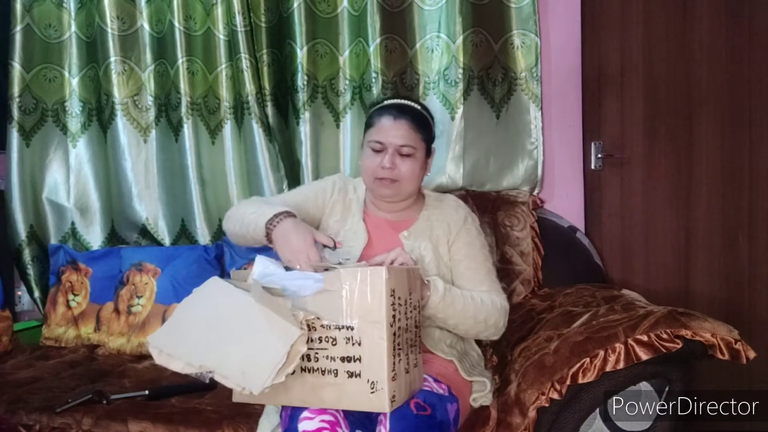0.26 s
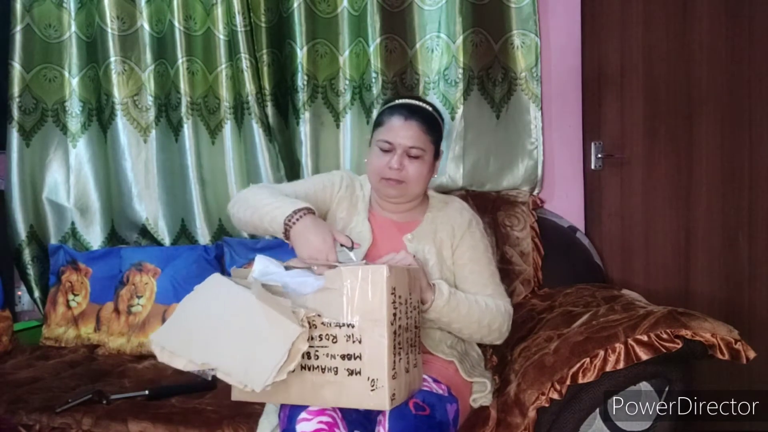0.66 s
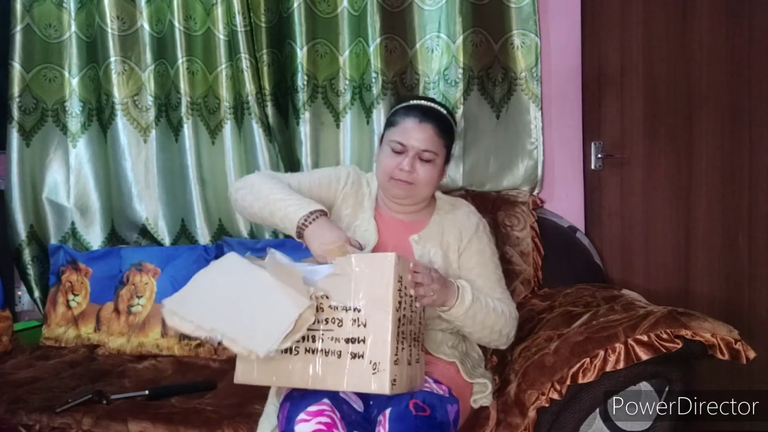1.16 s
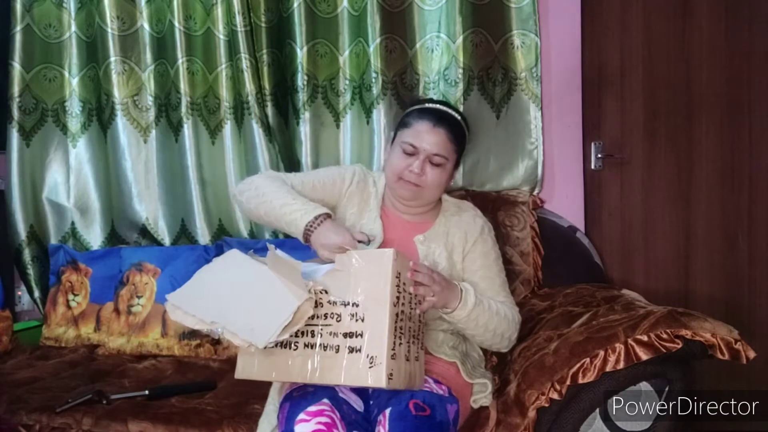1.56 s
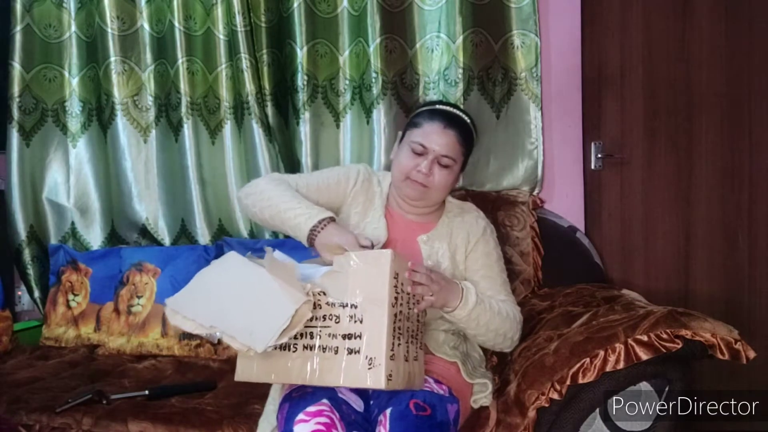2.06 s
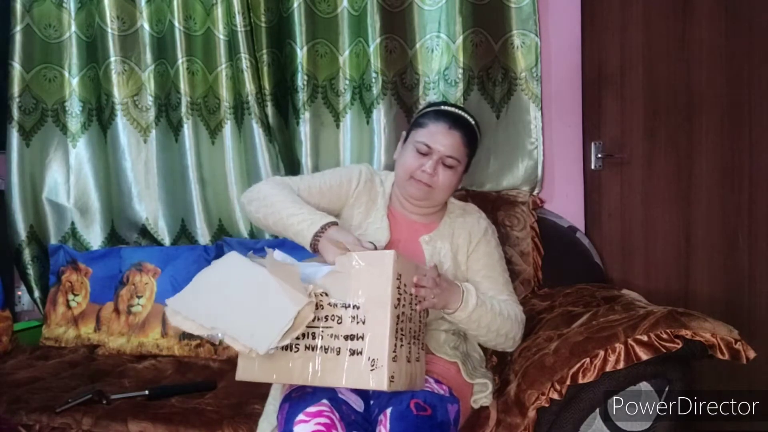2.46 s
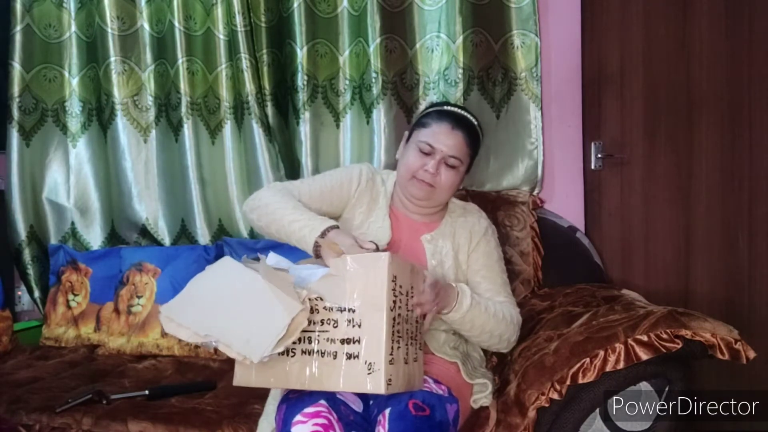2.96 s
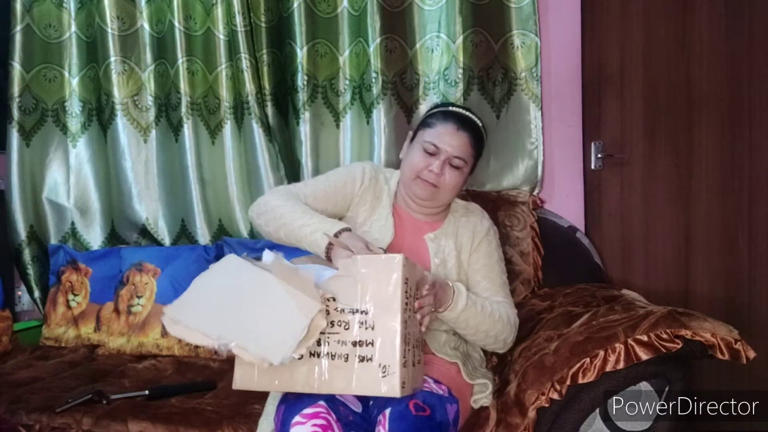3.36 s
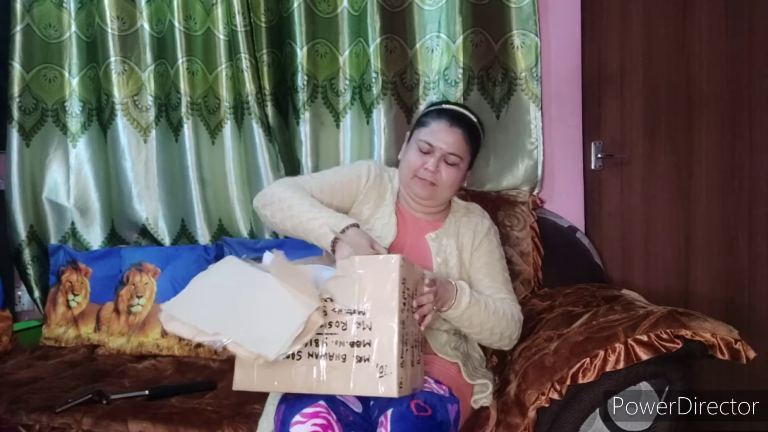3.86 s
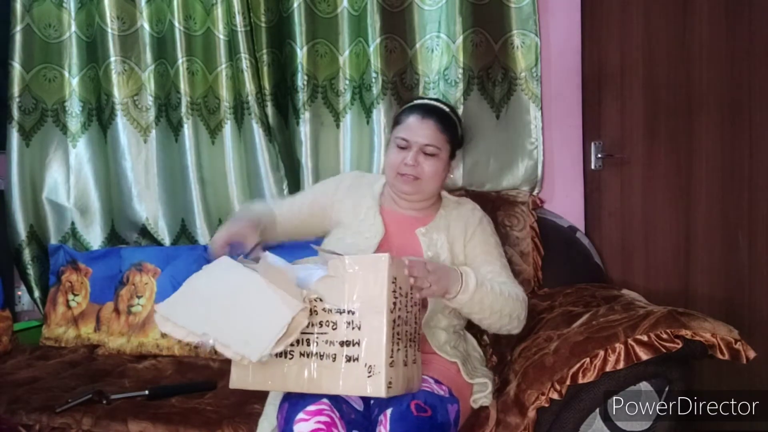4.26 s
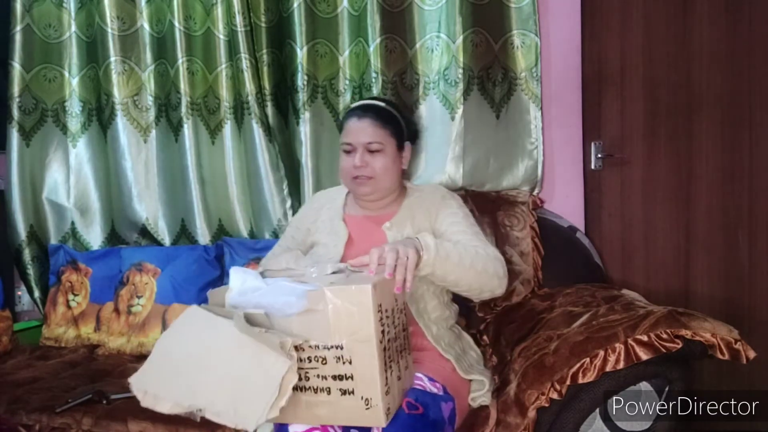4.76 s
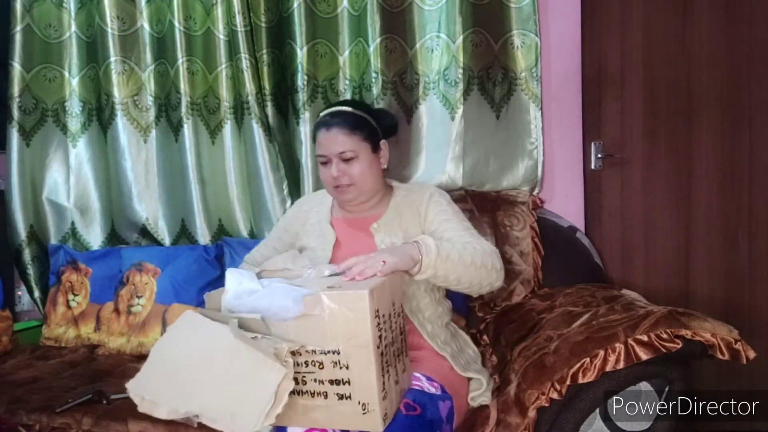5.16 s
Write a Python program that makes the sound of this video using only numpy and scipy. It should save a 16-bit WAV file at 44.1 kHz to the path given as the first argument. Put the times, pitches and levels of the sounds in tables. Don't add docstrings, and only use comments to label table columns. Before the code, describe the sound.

In a small furnished room, hands dig packing paper from a cardboard box about two metres from a phone's stereo microphone. Faint rustling opens, then a hollow knock at one second starts irregular crinkles, snaps and cardboard thumps. The loudest, sharpest paper crackle comes just after four seconds, followed by a lull, light crinkling and a final push of the box. Faint hiss and low rumble lie underneath.

```python
import sys
import numpy as np
from scipy import signal
from scipy.fft import rfft, irfft
from scipy.io import wavfile
from scipy.ndimage import uniform_filter1d

SR = 44100
rng = np.random.default_rng(int(sys.argv[2]) if len(sys.argv) > 2 else 0)


def store_pcm(level_fs):
    pcm = np.round(np.clip(level_fs, -1, 1) * 32767).astype(np.int16)
    wavfile.write(sys.argv[1], SR, np.atleast_2d(pcm).T)


def attenuation_scalar(level_db):
    decades = np.asarray(level_db, float) / 20
    return 10 ** decades


N = 238856


def walk(hold_s):
    k = int(hold_s * SR)
    levels = rng.standard_normal(1000)
    return uniform_filter1d(levels[np.arange(N) // k % 1000], k)


def grit(per_s, spread_db, flurry_db, flurry_s):
    chance = rng.random((N, 3)).T
    size_db = np.minimum(-spread_db * np.log(chance[1] + 1e-9), 4 * spread_db)
    size_db = size_db + flurry_db * walk(flurry_s)
    clicks = (chance[0] < per_s / SR) * attenuation_scalar(size_db) * np.sign(chance[2] - 0.5)
    return clicks / clicks.std()


def blows(times, db, shapes):
    out = np.zeros(N + shapes.shape[1])
    for s, gain, shape in zip(times, attenuation_scalar(db), shapes):
        out[int(s * SR):][:len(shape)] += gain * shape
    return out[:N]


def effort(sudden, slow, sudden_s, slow_share):
    s, db, fade, *relative = np.vstack([sudden, slow]).T
    fade = np.maximum(fade, 0.01)
    rise = np.r_[np.full(len(sudden), sudden_s), slow_share * fade[len(sudden):]]
    t = np.arange(0, N + 88, 44) / SR
    late = t[:, None] - s
    shape = attenuation_scalar(-40 * np.where(late < 0, -late / rise, late / fade))
    tracks = [10 * np.log10(shape @ attenuation_scalar(2 * (db + r)) + 1e-14) for r in [0, *relative]]
    return [np.interp(np.arange(N) / SR, t, track) for track in tracks]


def band(x, lo_hz, hi_hz):
    return signal.sosfilt(signal.butter(2, [lo_hz, hi_hz], "band", fs=SR, output="sos"), x)


def paper():
    # (time [s], crackle level [dB], 20 dB fade [s], papery body re crackle [dB])
    grabs = [(0.0, -52.5, 0.13, -26), (1.04, -48, 0.0532, -2), (1.16, -55.5, 0.1, -1.5),
             (1.51, -52.5, 0.17, -9.5), (1.88, -50, 0.04, 1.5), (2.55, -54, 0.2, -12),
             (2.655, -43.5, -0.17, -13), (3.59, -54.5, 0.12, 2.5), (4.01, -41.5, 0.194, -5.5),
             (4.96, -51, -4.55, -20), (5.29, -49.5, 1.5, -13)]
    pulls = [(.29, -58, 0.21, -22), (.5, -56.5, 0.33, -16), (0.789, -64, 0.24, -2),
             (.92, -59, 0.066, -34.5), (1.27, -56.5, 0.14, -12), (1.338, -46.5, 0.066, -6.5),
             (1.749, -43.5, 0.068, -8.5), (1.93, -49, 0.047, -23), (2.08, -56.5, .12, -7),
             (2.149, -51, 0.072, -1.5), (2.2, -61, 0.18, 2.5), (2.25, -56.5, .07, -8),
             (2.33, -49, 0.11, -6.5), (2.4, -55.5, 0.13, -23), (2.69, -55, 0.092, 6.5),
             (2.819, -47, .2, -13), (2.948, -49, 0.053, -6.5), (3.1, -68, 0.14, -15),
             (3.23, -47, 0.19, -7.5), (3.389, -51, 0.11, -5), (3.53, -53, 0.094, -8), (3.72, -53, 0.27, -8),
             (3.817, -48, 0.15, -8.5), (4.068, -29, 0.043, -13.5), (4.1, -35, 0.046, -25),
             (4.19, -57, 0.39, -16), (4.388, -55.5, 0.06, -11.5), (4.62, -67, 1, -6), (4.82, -64, 0.23, -6),
             (5.05, -52.5, 0.13, -6)]
    # (time [s], peak level [dB], papery body re peak [dB], thin top re peak [dB])
    snaps = [(0.4683, -41, -16, -23), (0.9043, -45, -33, -44), (1.1456, -46, -25, -21),
             (1.3319, -41, -12, -23), (1.5032, -36, -6.5, -13.5), (1.7499, -38, -27, -36),
             (1.922, -43, -2.5, -34), (2.0279, -50, -2.5, -46), (2.1249, -37, -6, -42),
             (2.1583, -31, -11, -61), (2.5351, -54, 4, -39), (2.6543, -25, -9.5, -51),
             (2.809, -34.5, -32, -37), (2.9464, -48, -15, -28), (3.5897, -37, 0.5, -48),
             (3.6506, -37.5, -4, -43), (4.0081, -38, -2, -29), (4.0632, -26.5, -5, -30),
             (4.0863, -30, -20, -32), (4.0932, -20, -35, -43), (4.1126, -22, -23, -36),
             (4.7019, -51, -25, -17), (4.8209, -54, -25, -12), (4.955, -52, -22, -26),
             (5.0168, -41.5, -22, -37), (5.0265, -51, -15, -33), (5.0545, -46, -19, -22)]
    tears = [(0.3006, -48, -21, -32), (1.0153, -42, -41, -40), (1.0375, -37.5, -11, -15),
             (1.245, -51, -25, -26), (1.2974, -42, -5, -22), (1.3072, -38.5, 3, -15),
             (1.728, -55, -29, -38), (1.873, -47, 1, -26), (2.2454, -38.5, -34, -44),
             (2.3087, -46, -5, -14), (2.7666, -41, 1.5, -36), (2.906, -39, -5, -22),
             (3.0423, -43.5, -2, -27), (3.1844, -42, -9, -27), (3.377, -43.5, 2, -33),
             (3.8112, -49, -16, -19), (4, -41.5, -24, -19), (4.0407, -29, -10, -31),
             (4.3685, -46, -22.5, -15), (4.9721, -41.5, -25, -19), (5.2847, -52, -24, -35),
             (5.2987, -41, -14, -13), (5.376, -37, -3, -16)]

    crisp_db, body_db = effort(grabs, pulls, sudden_s=0.027, slow_share=0.94)
    clicks = grit(per_s=2500.0, spread_db=2.0, flurry_db=3.5, flurry_s=0.012)
    s, snap_db, snap_body_db, snap_top_db = np.vstack([snaps, tears]).T
    snap_ms, tear_ms = 0.13, 3.8
    ms = np.repeat([snap_ms, tear_ms], [len(snaps), len(tears)])
    splutter = rng.standard_normal((len(s), 800))
    splutter[:, 0] = 6 * np.exp(-ms)
    splutter = splutter * np.exp(-np.arange(800) / SR * 1000 / ms[:, None])
    snap_db = snap_db - 5 * np.log10(ms)
    s = s + 0.0005

    crisp = clicks * attenuation_scalar(crisp_db + 7) + blows(s, snap_db + 8.0, splutter)
    body = clicks * attenuation_scalar(body_db + 19) + blows(s, snap_db + snap_body_db + 15.0, splutter)
    top = clicks * attenuation_scalar(crisp_db + 6.0) + blows(s, snap_db + snap_top_db + 29.5, splutter)
    return band(body, 1240.0, 3630.0) - band(crisp, 4100.0, 8980.0) + band(top, 12030.0, 21700.0)


def ring(x, modes):
    out, power = 0, 0
    for k, (hz, width_hz, db) in enumerate(modes):
        fade = np.exp(-np.pi * width_hz / SR)
        pole = fade * np.exp(2j * np.pi * hz / SR)
        mode = signal.lfilter([1], [1, -pole], x).imag
        out = out + (-1) ** k * attenuation_scalar(db) * np.sqrt(2 * (1 - fade ** 2)) * mode
        power += attenuation_scalar(2 * db)
    return out / np.sqrt(power)


def thuds(times, db, hz, t60):
    t = np.arange(SR // 3) / SR
    swell = 1 - np.exp(-t / 0.0042)
    return blows(times, db, np.sin(2 * np.pi * np.outer(hz, t)) * attenuation_scalar(-60 * t / t60) * swell)


def box():
    # (time [s], wall boom level [dB], 20 dB fade [s],
    # large flaps re boom [dB], small flaps re boom [dB])
    shoves = [(.1, -56.5, .14, -26, -15), (.29, -74, 0.1, -10, -19), (1.04, -36, 0.09, 5.5, -17),
              (1.3, -39, .09, -10, -10), (1.52, -51.5, -0.5, -10, 7), (1.88, -43.5, 0.12, -3, -7),
              (2.56, -47.5, -2.3, -17, 0.5), (2.78, -51.5, 0.23, -9, 4), (2.91, -45.5, .3, -1.5, -9.5),
              (3.05, -37.5, 0.1, -5, -38), (3.085, -43, -0.03, -29, -33), (3.57, -58.5, 0.87, -3, 8),
              (3.82, -44.5, 0.094, 7.5, 2), (4.01, -53.5, 0.27, 9, 5), (4.28, -57, 0.2, -10, -22.5),
              (4.6, -57, 0.04, 0, 5), (4.39, -65, 0.1, 12.5, 5)]
    # (time [s], wall boom level [dB], 20 dB fade [s], large
    # flaps re boom [dB], small flaps re boom [dB])
    leans = [(0.449, -66.5, 0.8, 5.5, -5), (.62, -64, 0.45, -1, 5), (.78, -62.5, 0.076, 5.5, 8.5),
             (1.065, -30, 0.027, -20, -30), (1.16, -55.5, 0.18, -11, -1), (1.34, -47.5, 0.12, -5, -0.5),
             (1.61, -57.5, 0.21, -1, -21), (1.76, -57, 0.22, 0, 5.5), (1.97, -55, .05, -7, -25),
             (2.15, -54, 0.11, 2, 3.5), (2.28, -61, 0.29, 8.5, 10.5), (2.37, -42, 0.094, 1.5, -8),
             (2.42, -53.5, 0.28, -25, -15), (2.62, -57, 0.13, 2.5, -17), (2.69, -60.5, 0.13, 7, 14.5),
             (2.98, -51, 0.12, -16, -24), (3.2, -56, 0.16, 4.5, 5.5), (3.39, -50.5, 0.17, 0.5, 1.5),
             (3.67, -56.5, .1, -13, -3), (3.76, -55, 0.14, 4, -10), (4.055, -39.5, 0.064, 7, 7.5),
             (4.2, -84.5, .15, 1, 0), (4.44, -67, 0.14, 6, -19), (4.95, -66.5, 1, -1.5, -1),
             (5.079, -43.5, 0.049, -9, -12),
        (5.35, -56.5, 0.19, 3.5, -0.5),
        (5.42, -36, 0.086, -12, -11.5),
    ]
    # (time [s], peak level [dB], pitch [Hz])
    bumps = [
        (0.108, -54, 89),
        (1.132, -58, 113),
        (2.789, -61, 56.6),
        (3.679, -79, 69.6),
        (4.097, -55, 85),
        (5.056, -59.5, 73.3),
        (5.378, -61, 56.5),
    ]
    # (time [s], peak level [dB], panel boom re peak [dB], panel pitch [Hz])
    knocks = [(0.19, -57.5, 3.5, 145), (0.263, -58, 4, 247), (0.437, -53.5, -11, 206),
              (0.524, -46.5, -8.5, 156), (0.644, -59, -2, 150), (0.746, -48, -12, 224),
              (1.038, -26.5, -1.5, 307.6), (1.298, -27, -12, 253), (1.333, -31, -10, 190),
              (1.505, -46.5, -9.5, 248), (1.582, -49, -2, 369), (1.74, -39.5, -15, 374.5),
              (1.874, -34, -10, 248), (1.922, -38, -5, 258), (2.08, -45.5, -9, 156),
              (2.358, -30.5, -10.5, 245), (2.538, -49, -3, 375), (2.596, -49, 4.5, 364),
              (2.674, -41.5, -6, 324), (2.773, -39, -10.5, 245), (2.835, -42, -11.5, 255),
              (2.875, -41, -15, 216), (2.907, -30, -16, 244), (3.045, -38, 2.5, 241),
              (3.108, -44, 1, 207.3), (3.338, -47, -5, 240), (3.813, -32.5, -9, 205.4),
              (4, -35.5, -4.5, 248.3), (4.249, -44.5, -15, 163), (5.341, -44, 0, 380)]
    # (time [s], peak level [dB], pitch [Hz])
    booms = [(1.051, -30.5, 153), (1.071, -34, 199), (1.324, -42, 199), (1.519, -52, 146),
             (2.352, -41, 204), (3.4, -40.5, 155.7), (3.679, -53, 159), (3.836, -35, 151),
             (4.276, -51.5, 165.6), (4.416, -53, 141), (5.071, -44.5, 176)]
    # (pitch [Hz], width [Hz], level [dB])
    wall_modes = [(126, 22, -10), (156, 13.7, -2), (199, 5, -1), (251.2, 31, -1.5), (294.3, 31, -0.5)]
    large_modes = [(367.4, 58, -1), (432.5, 96, 2), (505, 13.8, -3.5), (511.7, 16, 0), (642, 86, -6.5)]
    small_modes = [(788, 136, -0.5), (852, 35, 0.5), (898, 70, -5), (983, 60, -2.5), (1098, 90, -5),
                   (1219, 67, -6), (1580, 560, -5.5)]

    boom_db, large_db, small_db = effort(shoves, np.array(leans),
                                         sudden_s=0.014, slow_share=0.77)
    knock_s, knock_db, panel_db, panel_hz = np.transpose(knocks)
    contact_ms = 0.69
    phase = np.arange(200) / SR * 1000 / np.full((len(knock_s), 1), contact_ms)
    push = np.sin(np.pi * np.minimum(phase, 1))
    knock = blows(knock_s, knock_db + 27.5, push / push.sum(axis=1, keepdims=True))

    slips = grit(per_s=400.0, spread_db=2.5, flurry_db=2.0, flurry_s=0.02)
    boom = grit(per_s=200.0, spread_db=3.5, flurry_db=3.5, flurry_s=0.03) * attenuation_scalar(boom_db + 5.5)
    walls = ring(boom, wall_modes) + thuds(knock_s, knock_db + panel_db + 7, panel_hz, t60=0.17)
    large = ring(slips * attenuation_scalar(large_db + 6.0) + knock, large_modes)
    small = ring(slips * attenuation_scalar(small_db + 7.5) + knock * attenuation_scalar(3.0), small_modes)

    boom_s, side_db, side_hz = np.transpose(booms)
    side_panel = thuds(boom_s, side_db + 8.0, side_hz, t60=0.17)
    bump_s, bump_db, bump_hz = np.transpose(bumps)
    lap = thuds(bump_s, bump_db + 6.5, bump_hz, t60=0.34)
    return walls + side_panel + large + small + lap


def response():
    # (delay [s], left level [dB], right level [dB])
    echoes = [(.0007, -4.5, -13.5), (.0088, -8.5, -15.5), (0.014, -15, -8.5), (.017, -10, -8),
              (.026, -26, -9)]
    # (band centre [Hz], t60 [s], level [dB], likeness of the ports [0-1])
    reverb = [(194, 0.37, -6, 0.96), (632, 0.17, -6, 0.61), (1600, 0.18, 4.5, 0), (3900, 0.3, 1, 0),
              (9650, 0.28, 0.5, 0.21)]

    t = np.arange(SR // 2) / SR
    hz, t60, db, alike = np.transpose(reverb)
    edges = np.r_[30, np.sqrt(hz[1:] * hz[:-1]), 20000]
    build_up = 1 - np.exp(-t / 0.0021)
    out = np.zeros((2, len(t)))
    for k in range(len(hz)):
        noises = rng.standard_normal((3, len(t)))
        same, left, right = (band(n, edges[k], edges[k + 1]) for n in noises)
        tail = np.sqrt(alike[k]) * same + np.sqrt(1 - alike[k]) * np.array([left, right])
        unit = np.sqrt(np.log(1e6) / t60[k] / SR)
        out += tail * attenuation_scalar(db[k] - 60 * t / t60[k]) * unit * build_up
    port_lag = 1
    out[[0, 1], [0, port_lag]] += 1
    for lag, *side_db in echoes:
        out[[0, 1], int(lag * SR) + rng.integers(0, 12, 2)] += attenuation_scalar(np.array(side_db))
    return out


def room(x, count, hold_s):
    k = int(hold_s * SR)
    spot = np.repeat(rng.integers(0, count, N // k + 1), k)[:N]
    share = [uniform_filter1d(1.0 * (spot == i), 200) for i in range(count)]
    return sum(signal.fftconvolve((x * w)[None], response(), axes=1)[:, :N] for w in share)


def colour(x, points, size):
    hz, db = np.transpose(points)
    grid = np.fft.rfftfreq(size, 1 / SR)
    cepstrum = irfft(np.log(attenuation_scalar(np.interp(np.log(grid + 1), np.log(hz), db))))
    cepstrum[1:size // 2] *= 2
    cepstrum[size // 2 + 1:] = 0
    return signal.fftconvolve(x, irfft(np.exp(rfft(cepstrum))))[:len(x)]


def air():
    # (frequency [Hz], level [dB per Hz])
    air_points = [(20, 3), (40, -8), (90, -9), (200, -7), (500, -10), (1000, -19.5), (3000, -21.5),
                  (8000, -27.5), (16000, -23.5)]
    same, left, right = (colour(n, air_points, size=4096) for n in rng.standard_normal((3, N)))
    hush = (0.5 * same + np.array([left, right])) * attenuation_scalar(0.67 * walk(0.24))
    return hush / hush.std() * attenuation_scalar(-51)


def scene():
    return room(paper() + box(), count=5, hold_s=0.05) + air()


def low_pass(x):
    return signal.sosfilt(signal.butter(12, 15960, fs=SR, output="sos"), x)


def record(dry):
    # (frequency [Hz], level [dB])
    port_left = [(60, -6), (700, -7), (2400, -13), (5000, -17.5), (6500, -11.5), (8300, 1), (9300, -10),
                 (10500, -19.5), (15000, -26)]
    port_right = [(60, -10), (700, -12.5), (2400, -13.5), (5000, -14), (6200, -8), (7200, 1.5), (8600, -6),
                  (10000, -19), (15000, -24.5)]
    ports = np.array([colour(dry[0], port_left, size=1024), colour(dry[1], port_right, size=1024)])
    top_hz = 15450
    mix = signal.sosfilt(signal.ellip(10, 0.2, 70, top_hz, fs=SR, output="sos"), ports)
    return low_pass(mix)


dry = scene()
out = record(dry)
store_pcm(out)
```